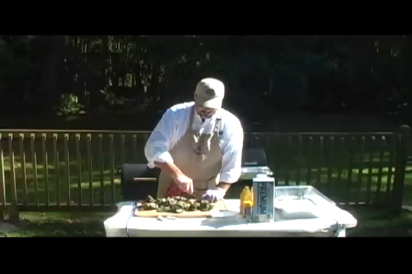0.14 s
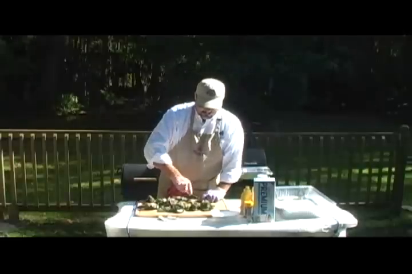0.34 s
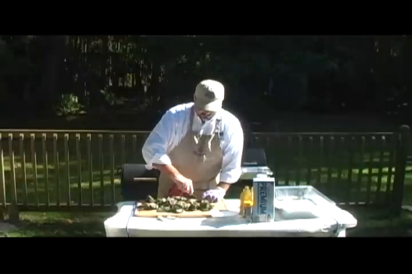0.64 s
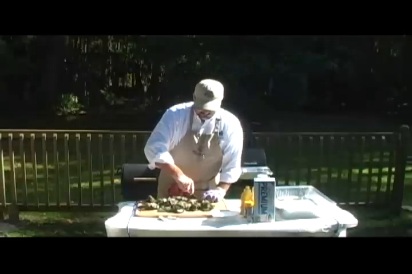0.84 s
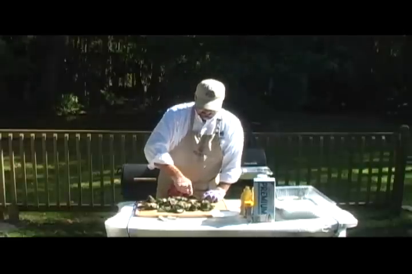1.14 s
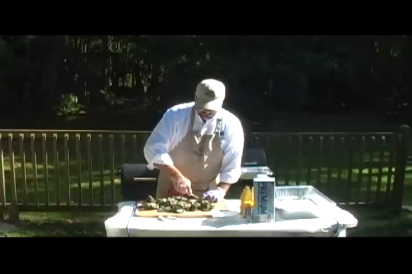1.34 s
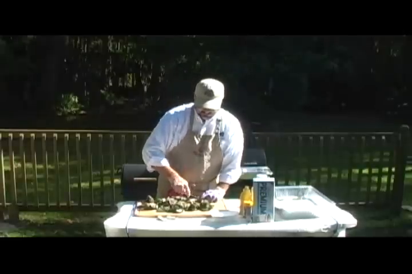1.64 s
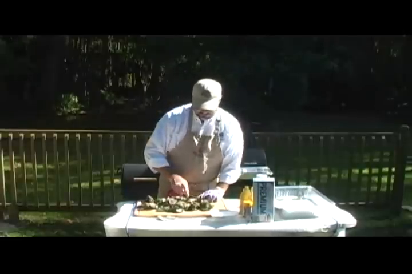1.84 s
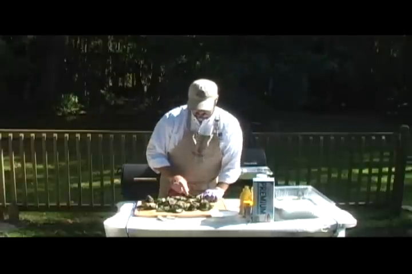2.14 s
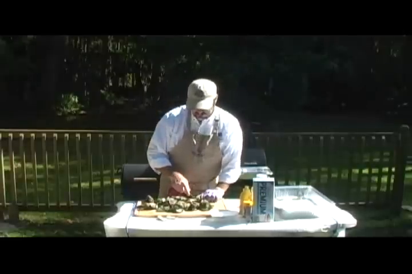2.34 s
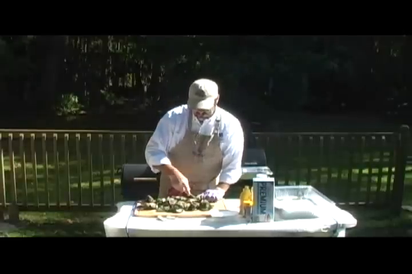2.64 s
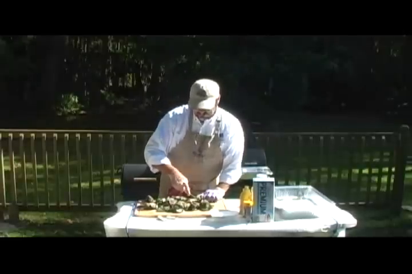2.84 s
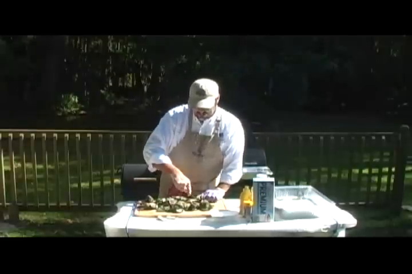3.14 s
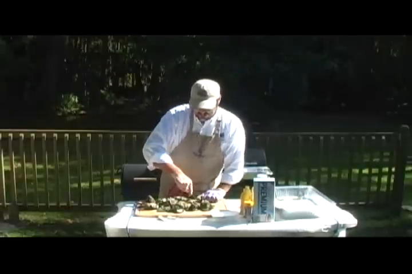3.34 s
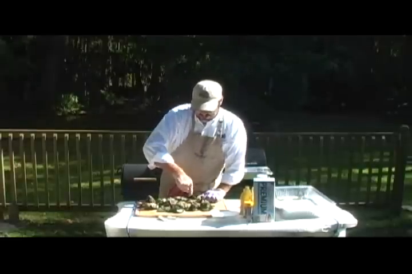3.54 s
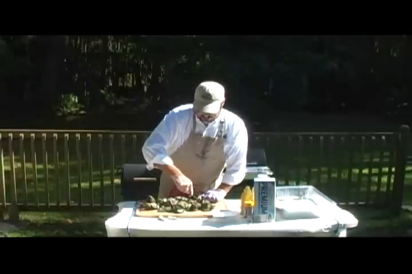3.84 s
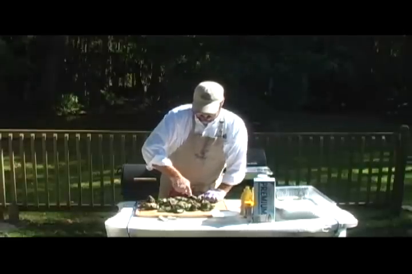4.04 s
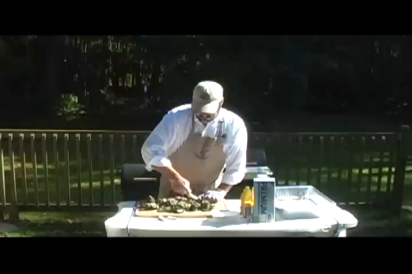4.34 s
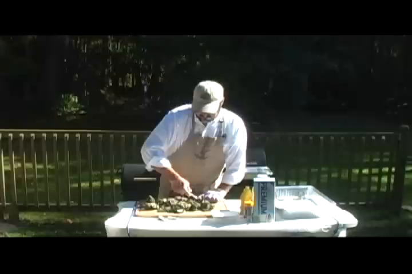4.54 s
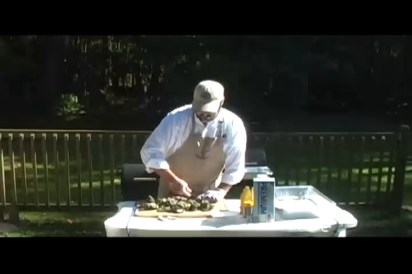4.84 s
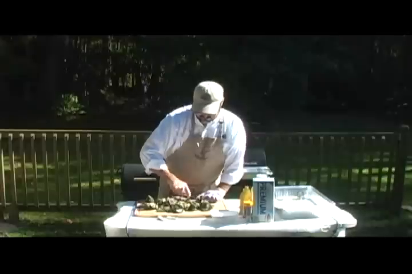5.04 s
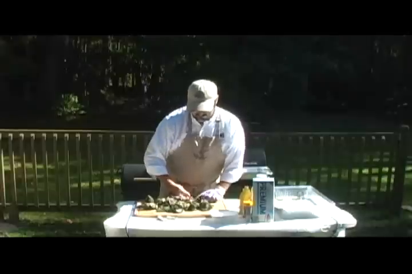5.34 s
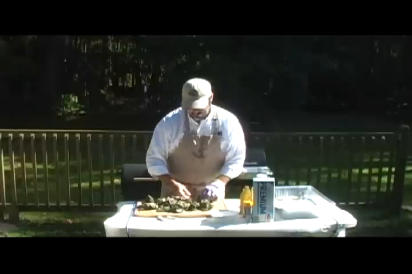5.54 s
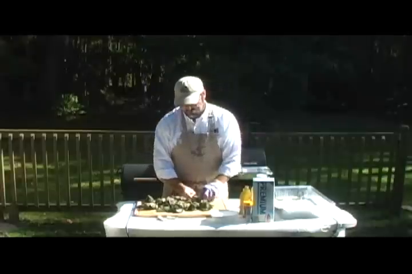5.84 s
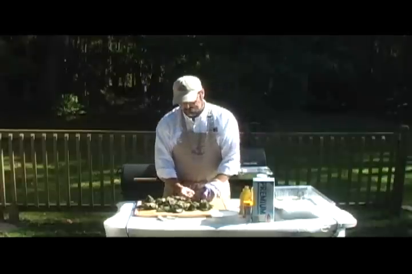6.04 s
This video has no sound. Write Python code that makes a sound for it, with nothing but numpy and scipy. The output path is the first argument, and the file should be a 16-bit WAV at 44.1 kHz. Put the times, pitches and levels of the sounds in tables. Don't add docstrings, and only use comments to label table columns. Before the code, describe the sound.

Oyster shells knock and scrape on a wooden board outdoors, with a few sharp loud cracks, over low machine hum and steady leafy, traffic-like rush.

```python
import sys
import numpy as np
from scipy import signal
from scipy.fft import rfft, irfft, next_fast_len
from scipy.io import wavfile
from scipy.ndimage import uniform_filter1d, map_coordinates

SR = 44100
rng = np.random.default_rng(int(sys.argv[2]) if len(sys.argv) > 2 else 0)


def persist_wave(psi):
    counts = np.round(np.clip(psi, -1, 1) * 32767).astype(np.int16)
    wavfile.write(sys.argv[1], SR, np.atleast_2d(counts).T)


def volts(x):
    e = np.asarray(x, float) / 20
    return 10 ** e


N = 273106

# centre_hz, width_hz, level_db
SHELL = [(4340, 200, -4), (4840, 190, 1), (5500, 350, -9), (6430, 220, -2), (6950, 240, -3),
         (7850, 260, -4), (9000, 260, 0)]
# centre_hz, width_hz, level_db
BOARD = [(303.6, 18, 15.5), (429.4, 52, 15.5), (580, 480, 6.5), (802, 390, 12), (1068, 380, 10.5)]


def unit(x):
    return x / np.sqrt(np.mean(x ** 2) + 1e-20)


def along(points, hz, axis=1):
    columns = np.transpose(points)
    return np.interp(np.log(hz + 1), np.log(columns[0] + 1), columns[axis])


def wobble(rate):
    knots = rng.standard_normal(int(N * rate / SR) + 4)
    return map_coordinates(knots, [np.arange(N) * rate / SR])


def filtered(x, response):
    n = x.shape[-1]
    size = next_fast_len(n + 4096)
    spectrum = rfft(x, size) * response(np.fft.rfftfreq(size, 1 / SR))
    return irfft(spectrum, size)[..., :n]


def body(modes, steep=1):
    def resonance(f, centre, width):
        return (1j * f * width / (centre * centre - f * f + 1j * f * width)) ** steep

    return lambda f: sum((-1) ** k * volts(db) * resonance(f, centre, width)
                         for k, (centre, width, db) in enumerate(modes))


def add(track, s, db, sound):
    spot = track[round(s * SR):][:len(sound)]
    spot += (volts(db) * sound / np.abs(sound).max())[:len(spot)]


def burst(t, t60, rise, snap=0):
    noise = rng.standard_normal(len(t)) * volts(-60 * t / t60) * (1 - np.exp(-t / rise))
    return noise + snap * (np.arange(len(t)) == 12)


def garden():
    # hz, level_db per Hz
    rush_colour = [(15, -68), (28, -14), (136, -4), (193, -6.5), (417, -8.5), (590, -12.5), (652, -10),
                   (1050, -16.5), (1280, -19), (1680, -20.5), (2500, -21.5), (4900, -24), (9600, -31),
                   (12500, -61), (21100, -120)]
    # centre_hz, width_hz, level_db
    insects = [(5170, 220, -22.5), (1258, 80, -14)]
    # hz, likeness [-1 to 1]
    likeness = [(60, 0.83), (500, 0.54), (3000, 0.16), (10000, 0.42)]
    z = signal.stft(rng.standard_normal((2, N)), nperseg=512)[2]
    patches = uniform_filter1d(rng.standard_normal(z.shape[1:]), size=6, axis=0)
    patches = uniform_filter1d(patches, size=12, axis=1)
    pair = signal.istft(z * volts(1.96 * unit(patches)), nperseg=512)[1][:, :N]

    def response(hz):
        turn = np.arccos(np.clip(along(likeness, hz), -1, 1)) / 2
        rush = volts(along(rush_colour, np.minimum(hz, 9500)))
        return np.hypot(rush, np.abs(body(insects)(hz))) * [np.cos(turn), np.sin(turn)]

    mid, side = filtered(pair, response)
    return volts(-43.5 + 0.12 * wobble(3.02)) * unit(np.array([mid + side, mid - side]))


def machine(tone_hz=103.5, drone_hz=141):
    # start_s, length_s, tone_db
    loads = [
        (0.138, 0.46, -52),
        (0.577, 0.42, -47),
        (1.545, 0.46, -44.5),
        (2.261, 0.917, -42),
        (3.797, 0.15, -55),
        (4.743, 0.21, -55),
        (5.152, 0.19, -56),
    ]
    # time_s, level_db
    drone_level = [(0.0, -48.5), (0.83, -50), (2.14, -44.5), (3.33, -55), (3.91, -44.5), (4.12, -64),
                   (4.15, -50.5), (5.52, -52), (5.77, -44.5), (5.81, -38.5), (5.86, -44.5), (6.19, -49.5)]
    rise_s, fall_s, idle_db = 0.085, 0.12, -58
    t = np.arange(N) / SR
    load = np.full(N, volts(idle_db))
    for s, length, db in loads:
        ramp = np.minimum((t - s) / rise_s, (s + length - t) / fall_s)
        load += volts(db) * np.clip(ramp + 0.5, 0, 1)
    tone = np.sin(2 * np.pi * np.cumsum(tone_hz + 0.85 * wobble(3.71)) / SR)
    drone = np.sin(2 * np.pi * np.cumsum(drone_hz + 4 * wobble(10.0)) / SR)
    drone_db = np.interp(t, *np.transpose(drone_level)) - 1.5 + 2.15 * wobble(21.03)
    return load * volts(1.1 + 0.29 * wobble(5.9)) * tone + volts(drone_db) * drone


def contacts(rows, modes, sharp, fixed_db, rise, snap):
    # centre_hz, width_hz, level_db
    tabletop = [(164, 74, -11), (236, 240, 12), (330, 62, 9.5)]
    track, t = np.zeros(N), np.arange(SR // 8) / SR

    def thud_response(f):
        return body(tabletop)(f) * body([(250, 300, 0)])(f)

    for s, db, hz, t60, *thud in rows:
        def response(f):
            own = body([(hz, hz / sharp, 0)])(f) * body([(hz, 1.5 * hz, 0)])(f)
            softness = (1 + 1j * f / (2.33 * hz)) ** 2
            return (own + volts(fixed_db) * body(modes)(f)) / softness

        add(track, s, db, filtered(burst(t, t60, rise, snap), response))
        for thud_db in thud:
            push = burst(t, 3.0 * t60, 0.001, snap=11.4)
            add(track, s, db + thud_db - 4.0, filtered(push, thud_response))
    return track


def shell_knocks():
    # start_s, peak_db, body_hz, thud_db (relative to the knock)
    knocks = [(0.101, -32.5, 840, -7), (0.172, -39, 580, 3), (0.374, -35.5, 1290, -16),
              (0.542, -30, 815, -19), (1.587, -31.5, 930, -13), (1.743, -41, 416, 10),
              (2.46, -33.5, 418, -8), (2.49, -22, 770, -21), (2.989, -38, 1900, -15),
              (3.003, -30, 1580, -1), (3.028, -40, 2470, -22), (3.039, -32, 397, -6),
              (3.062, -37, 1010, -7), (3.291, -34, 560, -2), (3.384, -24, 770, -8), (3.783, -40, 1800, -12),
              (3.884, -32, 970, -7.5), (4.088, -36, 910, -25), (4.095, -39, 900, -17),
              (4.139, -37.5, 1390, -26), (4.393, -31, 1700, -4), (4.485, -32, 1050, -11),
              (4.524, -31.5, 2600, -27), (4.857, -21.5, 1400, -26), (5.063, -32.5, 929, 3),
              (5.283, -33.5, 1780, -22), (5.316, -28, 1510, -18), (5.325, -30, 1700, -19),
              (5.371, -22, 720, -16), (5.77, -33.5, 795, -12), (4.892, -25, 263, -9),
              (5.689, -33, 800, -10), (5.495, -35, 950, -22), (5.365, -25.5, 700, -17),
              (5.478, -17, 880, -14.5), (5.485, -21, 880, -19), (5.594, -36.5, 650, -7),
              (5.667, -18.5, 774, -6), (5.799, -16, 780, -12), (5.813, -23, 720, -4),
              (5.833, -30, 780, -11)]
    t60_s = 0.046
    rows = [(s, db, hz, t60_s, thud_db) for s, db, hz, thud_db in knocks]
    return contacts(rows, BOARD, sharp=2.8, fixed_db=-24.5, rise=0.0016, snap=7.0)


def pressure(rows, offset_db, share, fall_power=2.32):
    t = np.arange(N) / SR
    total = np.zeros(N)
    for s, rise, fall, db, colour_db in rows:
        rising = np.clip(1 - (s - t) / rise, 0, 1)
        falling = np.clip(1 - (t - s) / fall, 0, 1) ** fall_power
        total += volts(db + offset_db + share * colour_db) * np.where(t < s, rising, falling)
    return total


def rubbing(effort, modes, clump_db, grit_db, fill_db):
    clumps = volts(clump_db * wobble(60) + grit_db * wobble(600))
    ring = filtered(rng.standard_normal(N) * clumps, body(modes, steep=2))
    broad = [(modes[2][0], modes[-1][0] - modes[0][0], fill_db)]
    rasp = filtered(rng.standard_normal(N) * clumps, body(broad, steep=2))
    return uniform_filter1d(effort, size=90) * unit(ring + rasp)


def scraping_and_rocking():
    # full_pressure_s, rise_s, fall_s, level_db, depth_db
    scrapes = [(.15, 0.021, 0.045, -40.5, -2.5), (.178, 0.01, 0.075, -41.5, -1.5),
               (.232, 0.0045, 0.037, -35.5, -0.5), (.376, 0.0065, 0.12, -40.5, 0),
               (.62, 0.067, 0.07, -33.5, -2.5), (.655, 0.054, 0.088, -40.5, -5.5),
               (.952, 0.017, 0.1, -50.5, 0), (1.14, 0.041, 0.18, -51, -5), (1.708, 0.03, 0.12, -38, -1.5),
               (1.742, 0.0046, 0.055, -34, -3.5), (1.77, 0.0059, 0.066, -40, 0.5),
               (1.8, 0.051, 0.15, -37.5, -5.5), (2.01, 0.027, 0.12, -49.5, -5),
               (2.084, 0.14, 0.25, -50, 4.5), (4.528, 0.0052, 0.089, -32, -6.5),
               (5.005, 0.04, 0.019, -36, 0), (5.045, 0.024, 0.063, -32.5, -4),
               (5.094, 0.036, 0.094, -35, 3.5), (5.17, 0.073, 0.12, -37, -4.5),
               (5.329, 0.014, 0.045, -38, 9), (5.45, 0.2, 0.045, -39, 1), (5.477, 0.04, 0.087, -39.5, 6.5)]
    # full_pressure_s, rise_s, fall_s, level_db, depth_db
    prising = [
        (3.694, 0.0056, 0.096, -44, 0.5),
        (3.734, 0.054, 0.07, -39.5, -5),
        (3.755, 0.024, 0.043, -51, -2),
        (3.783, 0.0059, 0.083, -44.5, 1),
    ]
    # full_pressure_s, rise_s, fall_s, level_db, brightness_db
    rocking = [(.11, 0.0048, 0.059, -32.5, -12), (.88, 0.035, 0.065, -44, -5),
               (1.594, 0.015, 0.058, -30, -9.5), (2.262, 0.062, 0.057, -46.5, 7.5),
               (2.764, 0.024, 0.054, -51, 5), (2.993, 0.013, 0.12, -46, 10.5),
               (3.05, 0.094, 0.14, -45.5, 3.5), (3.14, 0.088, 0.26, -50, -25),
               (3.62, .12, 0.12, -49.5, -25), (3.308, 0.071, 0.069, -39.5, -8.5),
               (4.008, 0.012, 0.1, -34, 0), (4.094, 0.017, 0.066, -47, 6),
               (4.138, 0.0074, 0.21, -50.5, 8.5), (4.905, 0.011, 0.098, -37, 12),
               (5.375, 0.022, 0.072, -30, -2.5), (5.675, 0.018, 0.1, -33.5, -18),
               (5.8, 0.015, 0.043, -22.5, -10.5), (5.835, 0.015, 0.095, -35.5, -13.5)]
    # centre_hz, width_hz, level_db
    lip = [(4200, 220, 0), (5000, 300, -8), (5450, 300, -1), (7100, 400, -4), (8050, 350, -2),
           (9400, 700, -6)]
    # centre_hz, width_hz, level_db
    cup_modes = [(1436, 540, 1.5), (1875, 220, -0.5), (2470, 80, -10), (3470, 790, -16)]
    settle_power = 2.28
    blade = scrapes + prising
    on_edge = pressure(scrapes, 0, 0) + pressure(rocking, -7, 0.77, settle_power)
    on_cup = pressure(blade, 0, 1) + pressure(rocking, 0, 1, settle_power)
    on_board = pressure(blade, -1.5, 0.75) + pressure(rocking, 0, 0, settle_power)
    edge = rubbing(on_edge, SHELL, clump_db=1, grit_db=2.8, fill_db=-7)
    edge += rubbing(pressure(prising, 0, 0), lip, clump_db=0.6, grit_db=2.5, fill_db=-7)
    cup = rubbing(on_cup, cup_modes, clump_db=1.5, grit_db=3, fill_db=-3)
    board = rubbing(on_board, BOARD, clump_db=2, grit_db=1.5, fill_db=0)
    return volts(-5.0) * edge + volts(-5.0) * cup + volts(-4.0) * board


def singing():
    # start_s, length_s, peak_db, pitch_hz
    swells = [(0.13, 0.077, -45, 4500), (.625, 0.03, -39, 4900), (.655, .045, -42, 4900),
              (1.74, .012, -35, 8900), (1.768, 0.019, -36, 9000), (1.765, .07, -39, 4830),
              (2.999, .012, -34, 1620), (3.025, 0.05, -41, 1580), (3.065, .04, -43, 1650),
              (3.692, 0.066, -45, 8050), (3.7, 0.06, -44, 4190), (3.705, 0.055, -43, 5410),
              (3.7, .05, -49, 7080), (4.564, 0.031, -48, 2750), (4.9, .035, -32, 3760),
              (4.905, .04, -33, 3460), (4.92, .05, -33, 1600), (5.07, 0.035, -34, 2650),
              (5.071, 0.018, -34, 3090), (5.128, .014, -37, 2650), (5.12, 0.075, -38, 4840),
              (5.06, .025, -38, 6450), (5.38, .025, -35, 7500), (5.415, .04, -37, 5100),
              (5.825, .04, -39, 1540), (5.8, .025, -32, 1270), (5.878, .03, -41, 1080),
              (5.845, .035, -36, 740)]
    rise_share = 0.25
    track = np.zeros(N)
    for s, length, db, hz in swells:
        u = np.arange(SR // 8) / SR / length
        swell = np.clip(np.minimum(u / rise_share, (1 - u) / (1 - rise_share)), 0, 1)
        grains = rng.standard_normal(len(u)) ** 3 / 4
        slip = 0.05 * np.sin(2 * np.pi * hz * length * u)
        mode = body([(hz, 110 + hz / 55, 0)], steep=2)
        add(track, s, db, filtered(swell * (grains + slip), mode))
    return track


def blade_ticks():
    # start_s, peak_db, ring_hz
    ticks = [(0.169, -28, 7840), (0.2274, -27, 9000), (.373, -27.5, 6500), (0.541, -36, 4270),
             (0.5774, -39, 3900), (.5815, -38, 4800), (0.602, -28, 6400), (.619, -35, 6600),
             (.645, -30, 7000), (.9507, -40.5, 4780), (0.993, -37, 7000), (1.19, -33.5, 4750),
             (1.588, -51, 3130), (1.7061, -33, 4770), (1.713, -31, 6960), (1.7397, -27, 8700),
             (1.757, -30, 6600), (1.768, -31, 8900), (1.809, -28.5, 7860), (1.824, -28, 7450),
             (1.86, -37, 5160), (2.253, -31.5, 4600), (2.461, -35, 4480), (3.3864, -37.5, 4800),
             (3.6915, -39, 5270), (3.78, -39, 7040), (3.882, -29, 6680), (4.391, -25, 5030),
             (4.4828, -32, 4440), (4.5262, -24.5, 4150), (4.674, -31, 6000), (4.8459, -25, 6500),
             (4.878, -30, 7000), (4.8945, -25, 4000), (4.8962, -17.5, 8540), (5.0316, -24.5, 8800),
             (5.044, -30.5, 9000), (5.2824, -27.5, 6500), (5.29, -32, 6000), (5.465, -17.5, 4800),
             (5.332, -15, 6200), (5.379, -20.5, 6860), (5.435, -22.5, 6000), (5.462, -16.5, 7200),
             (5.595, -36, 4800), (5.341, -30, 8000), (4.856, -26.5, 8000), (2.489, -36.5, 4200),
             (1.672, -38, 6000), (5.062, -30, 8900), (5.099, -28, 4000), (5.128, -30, 4800),
             (4.139, -40, 4500)]
    rows = [(s, db, hz, 0.008 + 30 / hz) for s, db, hz in ticks]
    return contacts(rows, SHELL, sharp=4, fixed_db=-11, rise=0.0008, snap=2.5)


def cracks():
    # start_s, peak_db, rattle_t60_s, rattle_db, snap (click height)
    blows = [
        (3.9966, -9, 0.04, -8, 18.4),
        (4.8487, -13.5, 0.082, -4, 9.9),
        (4.8867, -1, 0.025, -6.5, 6.4),
        (5.7846, -5.5, 0.074, -14.5, 13.8),
    ]
    # start_s, level_db (relative to its blow)
    splinters = [(3.998, -3.5), (4.003, -9), (4.013, -13), (4.021, -13), (4.032, -12), (4.041, -10),
                 (4.05, -18.5), (4.85, 4.5), (4.888, 6), (4.8913, -3.5), (4.8925, -2), (4.8948, -7.5),
                 (4.8965, -7.5), (4.906, -17), (4.911, -22), (4.916, -17), (4.93, -24), (4.939, -25),
                 (4.948, -26), (5.792, -9), (5.796, -7)]
    # centre_hz, width_hz, level_db
    hinge = [(197, 55, -12), (704, 220, 3.5), (1050, 160, 6.5), (1290, 140, 4.5), (1820, 140, 1),
             (2075, 310, 5.5), (2600, 840, -2), (3620, 300, -15), (4800, 590, -2), (5800, 1500, -11),
             (9770, 6800, -19.5)]
    # centre_hz, width_hz, level_db
    twist = [(239, 45, 6), (480, 180, -4.5), (1160, 320, 9.5), (1480, 180, 0), (2030, 90, 1.5),
             (2900, 560, 0.5), (3820, 220, 0), (4770, 380, -0.5), (5750, 1440, -8), (8350, 2200, -9)]
    # centre_hz, width_hz, level_db
    pop = [(249, 32, -1), (498, 110, -8), (930, 360, -6.5), (1503, 310, -2.5), (1720, 840, -4.5),
           (3110, 160, -2.5), (3760, 170, 2.5), (4510, 202, -3), (4800, 360, -5), (6500, 12400, -20.5),
           (8300, 1000, -11), (11250, 900, -31.5)]
    # centre_hz, width_hz, level_db
    dropped = [(201, 77, -6.5), (273, 45, -1), (493, 46, -2.5), (555, 110, 8), (720, 480, 4),
               (1118, 123, 7), (1410, 540, -6.5), (2340, 270, -18), (3370, 1000, -18), (4800, 120, -13),
               (7200, 830, -22.5)]
    track, t = np.zeros(N), np.arange(SR // 4) / SR
    for (s, db, t60, rattle_db, snap), modes in zip(blows, [hinge, twist, pop, dropped]):
        push = (t / 0.00024) * np.exp(1 - t / 0.0003) * 0.18
        push += 0.65 * burst(t, 0.037, 0.00056, snap)
        reach_s = 0.03 if modes is twist else 0.07
        for late_s, late_db in splinters:
            if 0 < late_s - s < reach_s:
                splinter = burst(t[:SR // 100], 0.0045, 0.00028, snap=3.5)
                add(push, late_s - s, late_db + 12, splinter)
        rattle = filtered(burst(t, t60, 0.00054), lambda f: 1 / (1 + 1j * f / 3500))
        ring = body([(hz, 1.21 * width, level) for hz, width, level in modes], steep=2.04)
        between = body([(hz, 0.45 * hz, level - 7.5) for hz, _, level in modes], steep=2)
        add(track, s, db, filtered(push + volts(rattle_db) * rattle, lambda f: ring(f) + between(f)))
        lead_in = filtered(burst(t[:SR // 80], 0.019, 0.00044)[::-1], between)
        add(track, s - len(lead_in) / SR, db - 18, lead_in)
    return track


def nearby(x):
    # delay_s, level_db
    echoes = [(.0056, -11), (.0105, -18.5), (.015, -17.5), (.024, -19)]
    return filtered(x, lambda f: 1 + sum(volts(db) * np.exp(-2j * np.pi * f * s) for s, db in echoes))


def yard(x):
    # hz, t60_s
    decay = [(200, 0.24), (1000, 0.35), (3000, 0.31), (10000, 0.28)]
    hz, t, z = signal.stft(rng.standard_normal((2, SR // 2)), SR, nperseg=256)
    tail = signal.istft(z * volts(-60 * t / along(decay, hz)[:, None]), SR, nperseg=256)[1]
    delayed = np.pad(x, (150, 0))[None]
    return signal.fftconvolve(delayed, tail / np.linalg.norm(tail[0]), axes=1)[:, :N]


def scene():
    impacts = shell_knocks() + blade_ticks() + cracks()
    work = scraping_and_rocking() + singing() + nearby(impacts)
    return work + volts(-7.5) * yard(work) + machine() + garden()


def gate_weak_lines(x):
    # hz, threshold_db
    threshold = [(2000, -13), (5000, -9), (8000, -6), (9500, -3), (9950, -1), (10050, 5.5), (10600, 4.3),
                 (10750, 11), (11400, 11), (11550, 8.2), (11800, 8.2), (11950, 14), (12200, 30)]
    # start_s, length_s
    attacks = [
        (.2274, .008),
        (1.19, .008),
        (3.992, .016),
        (4.882, .018),
        (5.03, .014),
        (5.46, .014),
    ]
    hz, _, z = signal.stft(x, SR, "cosine", nperseg=2048)
    power = uniform_filter1d(np.sum(np.abs(z) ** 2, axis=0), size=3, axis=0)
    usual = uniform_filter1d(np.median(power, axis=1, keepdims=True), size=24, axis=0)
    loudness = power[100:450].sum(axis=0) / usual[100:450].sum()
    mask = usual * loudness ** 0.75
    need = volts(2 * np.where(hz > 1500, along(threshold, hz), -99))[:, None]
    thin = signal.istft(z * (power / mask > need), SR, "cosine", nperseg=2048)[1][:, :N]
    t = np.arange(N) / SR
    attack = sum(1.0 * (t > s) * (t < s + length) for s, length in attacks)
    lost = filtered(x - thin, lambda f: f < 12100)
    return thin + uniform_filter1d(attack, size=128) * volts(-13) * lost


def top_cut(x):
    return signal.sosfilt(signal.butter(12, 11980, fs=SR, output="sos"), x)


def record(dry):
    # hz, left_lead_rad, left_minus_right_db
    port_offsets = [(60, -1.01, -3.5), (300, -0.75, -1.5), (1100, -0.69, -2), (2630, -0.43, -2),
                    (6000, -0.76, -2.5), (11200, -0.55, 0)]

    def response(hz):
        offset = volts(along(port_offsets, hz, axis=2)) * np.exp(1j * along(port_offsets, hz))
        treble = volts(along([(9500, 1), (10400, 3.5), (11900, 3), (12150, -40)], hz))
        return offset ** np.array([[0.5], [-0.5]]) * treble

    heard = filtered(dry, response)
    rounded = heard / (1 + np.abs(heard / 0.9) ** 8) ** (1 / 8)
    mix = gate_weak_lines(rounded)
    return top_cut(mix)


dry = scene()
out = record(dry)
persist_wave(out)
```